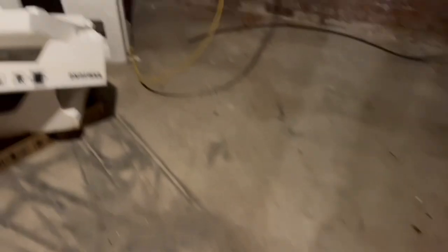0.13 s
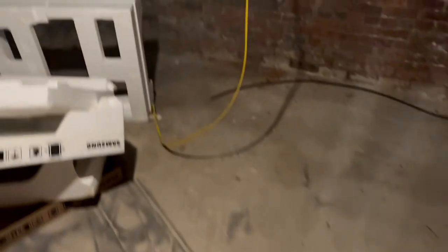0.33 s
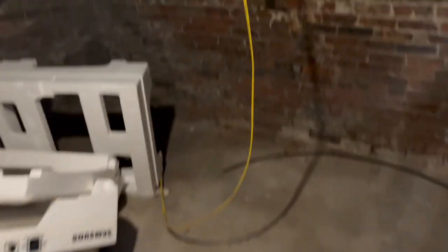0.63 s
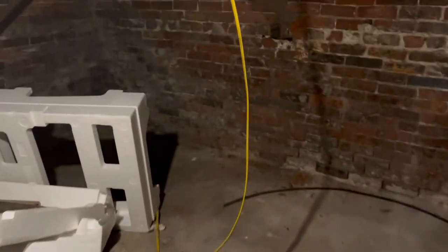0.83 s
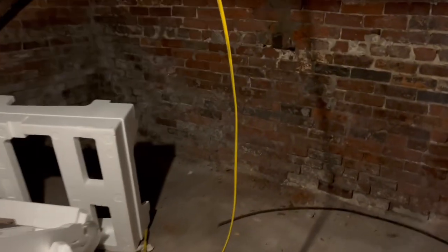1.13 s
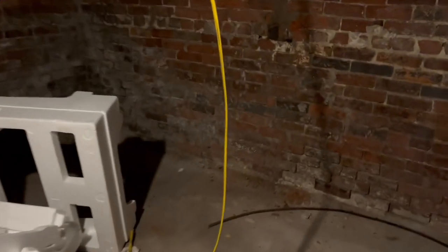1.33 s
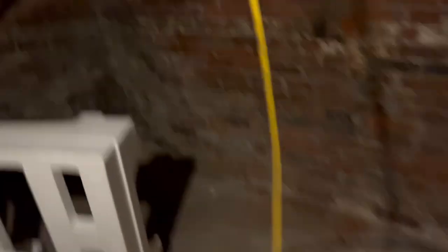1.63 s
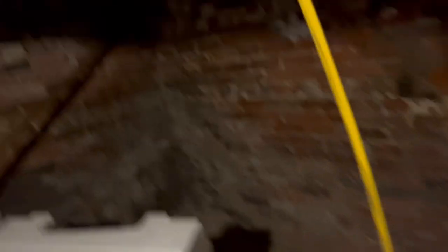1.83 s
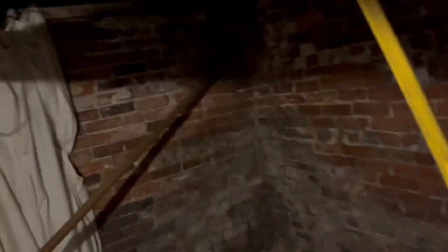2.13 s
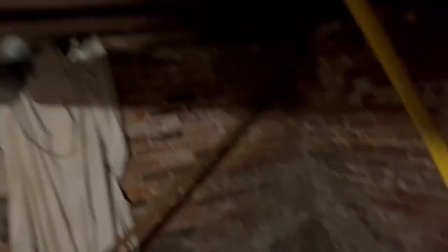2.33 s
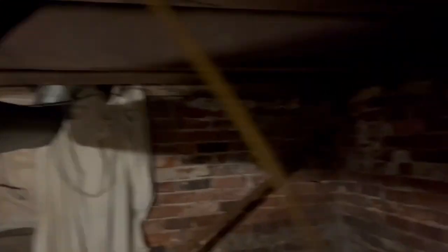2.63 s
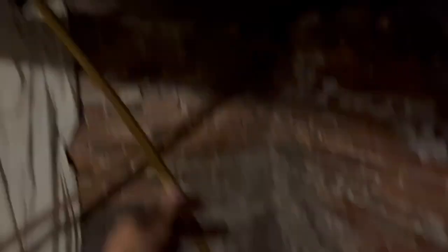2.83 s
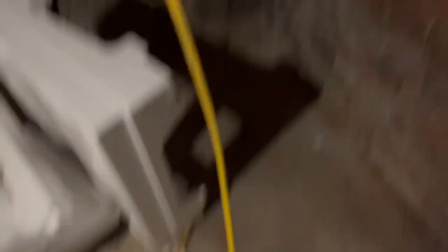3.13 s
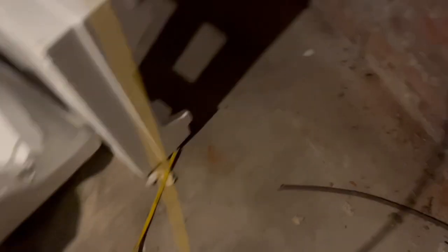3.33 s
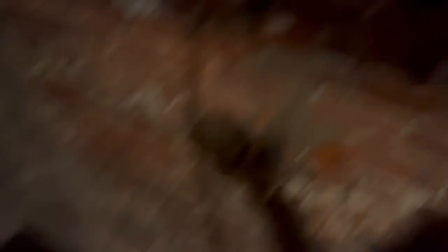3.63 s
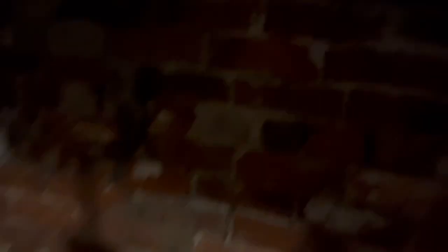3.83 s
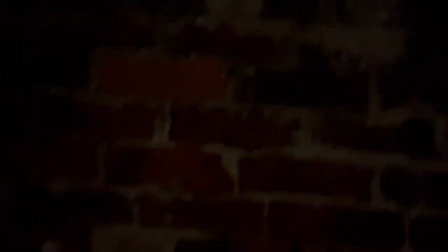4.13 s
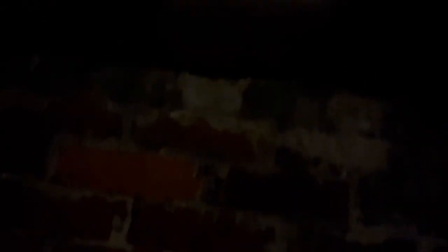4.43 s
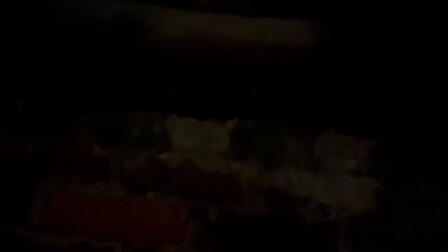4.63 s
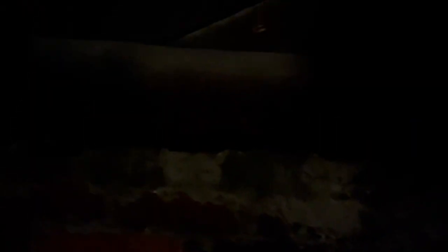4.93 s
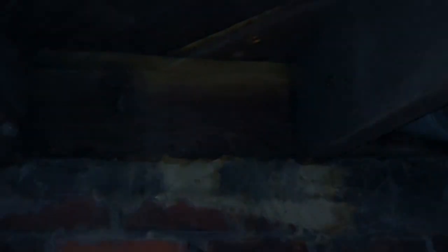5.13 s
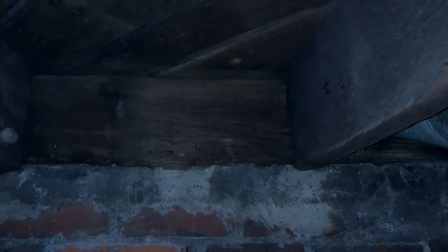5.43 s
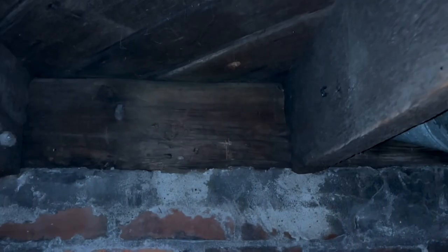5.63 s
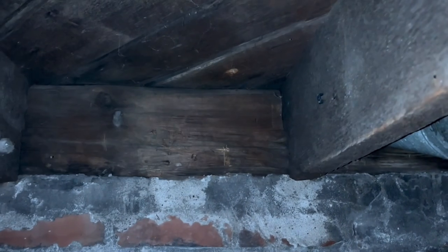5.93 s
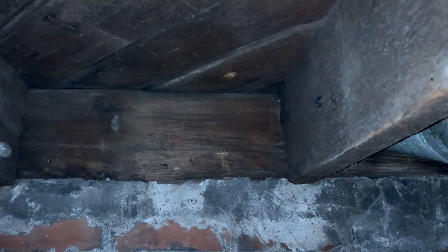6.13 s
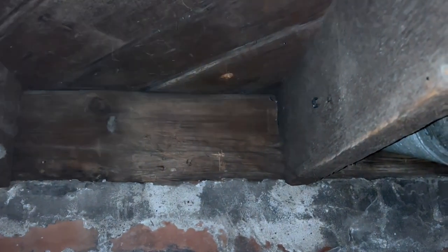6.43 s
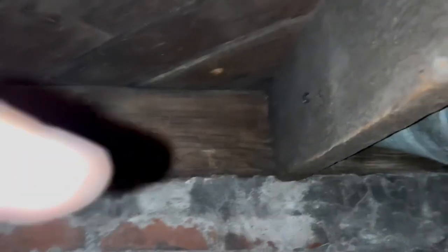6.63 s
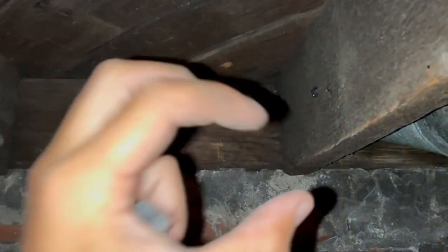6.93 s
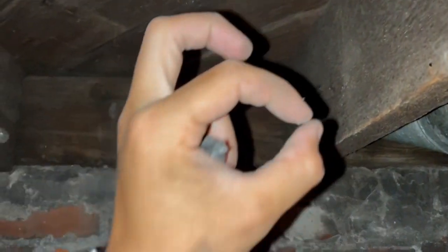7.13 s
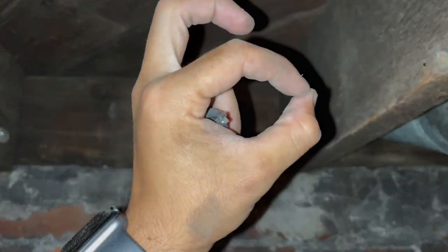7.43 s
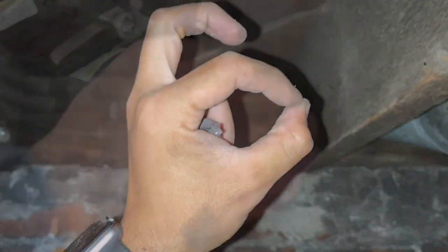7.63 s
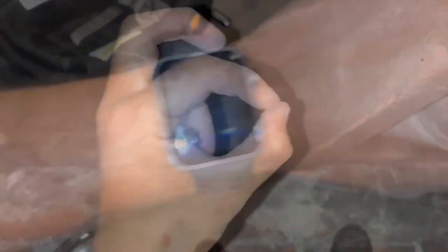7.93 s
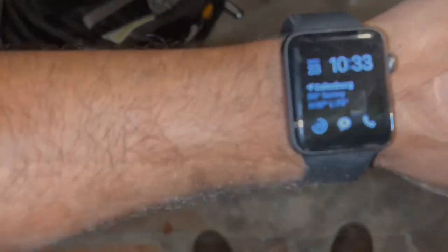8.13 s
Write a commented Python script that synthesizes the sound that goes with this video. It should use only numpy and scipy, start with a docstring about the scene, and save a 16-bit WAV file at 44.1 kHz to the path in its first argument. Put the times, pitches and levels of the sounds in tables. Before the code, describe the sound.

Loud blows on boards crack and echo in a cramped brick basement, with faint steel ringing, gritty scuffs and low hum between.

```python
"""Over a low hum and an airy rustle that rise and fall as shaped noise, soft bumps and scuffs come first.
Then hard blows on boards ring through a small brick cellar: contact noise excites damped board modes,
a beating steel pair rings thinly, and the walls answer with noise whose bass comes late and long.
Gritty rubbing fills the gaps; from 4.7 to 7.7 s the far-wall echo is absent and the late tail weaker.
Near the end a faint sine fades in, shortly before the last blow."""
import sys
import numpy as np
from scipy import signal
from scipy.fft import rfft, irfft, next_fast_len
from scipy.io import wavfile
from scipy.ndimage import uniform_filter1d

SR = 44100
rng = np.random.default_rng(int(sys.argv[2]) if len(sys.argv) > 2 else 0)


def waveform_to_disk(signal):
    """Save audio, clipped to [-1, 1], as 16-bit WAV at the path in sys.argv[1]."""
    frames = np.transpose(np.atleast_2d(signal))
    scaled = np.clip(frames, -1, 1) * 32767
    samples = np.round(scaled).astype(np.int16)
    wavfile.write(sys.argv[1], SR, samples)


def invert_db(level):
    """Linear amplitude ratio for a level in decibels (20 dB per decade), elementwise."""
    return 10 ** (np.asarray(level, dtype=float) / 20)


N = 365588  # samples
BANDS_HZ = 30 * 2 ** (np.arange(28) / 3)  # third-octave centres

# Hard blows. Each row: time in seconds, blow level in dB, wall level in dB, brightness in dB per octave,
# favoured tone in Hz, bass lift in dB.
KNOCKS = [(1.155, 2.5, -22, 0.53, 4300, -2), (1.62, -6, -24, 1.47, 1350, -2),
          (2.122, -1.5, -23, 1.24, 1700, 2.5), (2.679, -4, -23, 0.85, 3100, 5),
          (3.167, -0.5, -24, 1.09, 480, 0.2958), (3.676, -1.5, -23, 0.59, 3100, -3),
          (4.08, -26, -38, -0.5, 420, 3), (4.241, 1.5, -27, 0.294, 500, -1.5),
          (4.98, 1.5, -25, -2.5, 3250, -2.5), (5.47, -6, -29, -2.5, 3900, -3),
          (7.839, -10.5, -33, 2, 1900, -2)]
# Soft bumps of feet and hands. Each row: time in seconds, blow level in dB, wall level in dB,
# strongest frequency in Hz, fall-off in dB per octave.
BUMPS = [(.545, -37, -45, 110, 9), (1.505, -41, -47, 200, 8), (2.569, -39, -45, 340, 19),
         (3.932, -50, -66, 7000, 3), (3.968, -52, -68, 7000, 3), (4.79, -48, -68, 8000, 3),
         (4.815, -42, -66, 2000, 2), (6.481, -37, -66, 600, 7), (6.572, -37, -68, 600, 8),
         (6.772, -44, -50, 550, 10), (7.134, -51, -68, 500, 4), (7.317, -54, -58, 280, 8)]
# Modes of the struck boards, nominal before each blow varies them. Each row: frequency in Hz, level in dB,
# 60 dB decay time in seconds.
BOARD_MODES = [(170, -16, .05), (345, -9, .035), (526, 1, .025), (860, 0, .02), (1290, -2.5, .015),
               (2035, -1, .012), (2910, -2, .012), (3400, 1, .012), (4330, -2, .008), (5550, -1, .006),
               (7000, 1, .005), (9900, -1, .004), (12600, -1, .005)]
# Colour shared by all cracks. Each row: frequency in Hz, level in dB.
CRACK_COLOUR = [(500, 0), (1300, -7), (3000, 0.5), (9000, 0.5)]
# Colour shared by the echoes of hard blows. Each row: frequency in Hz, level in dB.
ECHO_COLOUR = [(90, -4), (250, -9.5), (520, 0.5), (850, -6), (1300, -5), (2050, -8), (3100, -3.5),
               (4500, -6), (9000, -13.5)]
# Bass modes of the cellar. Each row: frequency in Hz, relative level in dB, 60 dB decay time in seconds.
CELLAR_MODES = [(58, -6, .6), (74, -0.5, 1.2), (101, 2, .7), (128, -4, .5)]
# The walls' answer. Each row: frequency in Hz, level in dB, 60 dB decay time in seconds, build-up in seconds.
WALLS = [(40, -11.5, 0.54, .03), (69, -4.5, 0.55, .03), (150, -6.5, .65, 0.011), (324.1, -4.5, 0.52, 0.012),
         (636, -4, 0.43, 0.011), (1470, -2, 0.33, 0.0084), (1840, -9, 0.39, 0.0048),
         (2150, -2, 0.33, 0.013), (2900, -6, 0.27, 0.013), (6500, -1.5, 0.26, 0.0046),
         (11300, -4, 0.27, 0.0058), (15000, -14, .18, 0.026)]
# Blows that leave the steel ringing. Each row: time in seconds, low ring in dB, its 60 dB decay time
# in seconds, high ring in dB.
STEEL_RINGS = [(1.62, -27, .38, -85), (2.122, -42, .4, -55), (2.679, -26, .5, -47), (3.167, -35, 1.0, -85),
               (3.675, -29, .45, -55), (4.24, -36, .5, -55), (4.979, -50, .4, -62), (5.47, -55, .4, -72),
               (7.839, -47, .4, -50)]
# Close low steel modes that beat. Each row: frequency in Hz, relative level in dB.
STEEL_PAIR = [(2923, 0), (2903, -5)]
# Soles, cloth and hands rubbing. Each row: start in seconds, length in seconds, level in dB,
# tilt in dB per octave above 400 Hz.
SCUFFS = [(0, .12, -60, 1), (.54, .1, -64, 2), (.7, .17, -65, 1), (1.5, .1, -59, 1), (2.35, .3, -61, 4),
          (2.96, .025, -53, 5), (3.0, .06, -47, 5), (3.53, .05, -48, 4), (4.0, .07, -53, 3),
          (4.085, .14, -39, 0.5), (4.545, .09, -52, 2), (4.85, .1, -53, -1), (6.19, .1, -67, -6),
          (6.38, .025, -65, 0), (6.49, .05, -55, -1), (6.545, .025, -50, 1), (6.62, .12, -67, -3),
          (6.78, .22, -52, -7), (7.135, .025, -63, -1), (7.21, .17, -70, 3), (7.33, .18, -54, -8),
          (7.445, .19, -60, 0.5)]
# Spectrum of rubbed grit. Each row: frequency in Hz, density in dB per Hz.
GRIT = [(100, -12), (250, 0), (500, -1.5), (800, -8), (1300, -9), (2000, -17), (4500, -13), (6500, -16),
        (9000, -23), (12500, -28), (16000, -36)]
# Spectrum of the hum. Each row: frequency in Hz, density in dB per Hz.
HUM = [(15, -46), (25, -16), (43, -7.5), (75, -5), (107, 0.5), (199, -27), (232, -24), (437, -39),
       (1500, -48.5), (1950, -78), (3300, -120)]
# Spectrum of the airy rustle. Each row: frequency in Hz, density in dB per Hz.
AIR = [(100, -10), (200, 0), (450, 0), (1300, -8), (2000, -16), (3200, -15), (4500, -10), (6500, -17),
       (9000, -25), (16000, -36)]
# Background levels. Each row: time in seconds, hum in dB, airy rustle in dB.
BACKGROUND = [(0, -56, -62), (.9, -55, -67), (1.5, -50, -64), (2, -50, -73), (2.5, -50, -66),
              (4.45, -49, -64), (4.75, -56, -72), (5.7, -62, -88), (6.2, -67, -88), (6.7, -68, -88),
              (6.9, -60, -84), (7.6, -55, -77), (8.29, -53, -80)]
# Likeness of the diffuse sound at the two ports. Each row: frequency in Hz, correlation.
LIKENESS = [(60, 1), (250, .8), (600, .45), (1500, .1), (6000, 0), (7400, -.5), (7900, -.98), (9300, -.98),
            (10300, 0), (11000, 0.94), (13200, .93), (14300, -.6)]
# Phase of the direct sound between the ports. Each row: frequency in Hz, lead of the left in radians.
PORT_PHASE = [(100, 0.5), (2300, 0.1635), (2920, 1.83), (3700, 0.3155), (5600, -0.6273), (7700, -1),
              (9500, -3.5), (11000, -7), (13400, -7), (15000, -9)]
# Span in which the microphone is held in a nook: start and end in seconds.
NOOK_S = (4.7, 7.7)

NOOK_DB = -7  # the nook shields from the far corners; it also hides the far wall
CONTACT_S, CONTACT_RISE_S = .0022, .0016  # a knock's chatter: decay, time to its peak
FAVOUR_DB, FAVOUR_OCTAVES = 6.5, 0.75  # where a blow lands lifts one region of tones
CRACK_SHARE = .6  # how much of a blow's own colour shows in the crack
FAR_WALL_S, FAR_WALL_DB = 0.02, 3.5  # the strongest echo: delay, lift
LATE_DB, LATE_STRETCH = -23, 1.68  # a weaker, slower tail from the further corners
TAIL_RING_DB, TAIL_RING_WIDTH = -1, .035  # board tones in the echoes: dB, width as a share of pitch
STEEL_HIGH_HZ, STEEL_HIGH_T60_S = 10605, .6
STEEL_HELD_S, STEEL_FADE_S = .35, .05  # the grip tightens for the next swing and damps the ring
DRONE_HZ, DRONE_DB, DRONE_S, DRONE_RISE_S = 188, -54, 7.45, .7


def along(table, hz, col):
    """Linear interpolation of a table column on a log-frequency axis."""
    table = np.asarray(table, float)
    return np.interp(np.log(hz), np.log(table[:, 0]), table[:, col])


def add(out, sound, s):
    """Superposition: mixes a sound or a power envelope in at time s."""
    i = int(s * SR)
    out[..., i:i + sound.shape[-1]] += sound[..., :N - i]


def stepped_noise(shape, size, step):
    """Random levels held for step samples, then smoothed into a slow fluctuation."""
    draws = rng.standard_normal((*shape, size // step + 1))
    held = np.repeat(draws, step, axis=-1)
    return uniform_filter1d(held, step, axis=-1)[..., :size]


def ring(hz, t60, size):
    """Free vibration of one damped mode: a sine under exponential decay."""
    t = np.arange(size) / SR
    return np.sin(2 * np.pi * hz * t) * np.exp(-np.log(1000) * t / t60)


def tint(hz, bright_db, favoured_hz):
    """Excitation spectrum of a blow: a tilt above 500 Hz and a lift around one favoured region."""
    tilt = bright_db * np.log2(np.clip(hz / 500, 1, None))
    octaves = np.log2(hz / favoured_hz)
    return tilt + FAVOUR_DB * np.exp(-(octaves / FAVOUR_OCTAVES) ** 2)


def strike(colour_db, contact_s):
    """Modal excitation: brief, uneven contact forces convolved with the boards' damped modes."""
    t = np.arange(int(.015 * SR)) / SR - CONTACT_RISE_S
    decay = np.where(t < 0, CONTACT_RISE_S / 2, contact_s)
    contacts = rng.standard_normal(len(t)) ** 3 * np.exp(-np.abs(t) / decay)  # cubing makes touches sparse
    contacts[int(CONTACT_RISE_S * SR)] = 9.0  # a hard touch at the peak
    size = int(.08 * SR)
    body = np.zeros(size)
    for (hz, db, t60), mode_tint in zip(BOARD_MODES, colour_db):
        level = invert_db(db + mode_tint + 2.0 * rng.standard_normal())
        body += level * ring(hz * (1 + .03 * rng.standard_normal()), t60, size)
    sound = signal.fftconvolve(contacts, body)
    return sound / np.abs(sound).max()


def blows():
    """Source and room response: direct sound, cellar bass modes, and the power the walls send back."""
    direct, booms, power = np.zeros(N), np.zeros(N), np.zeros((len(BANDS_HZ), N))
    board_hz = np.array(BOARD_MODES)[:, 0]
    bass = np.clip(np.log2(300 / BANDS_HZ) / 1.5, 0, 1)
    for s, db, wall_db, bright_db, hz, bass_db in KNOCKS:
        colour_db = along(CRACK_COLOUR, board_hz, 1) + CRACK_SHARE * tint(board_hz, bright_db, hz)
        add(direct, invert_db(db) * strike(colour_db, CONTACT_S), s - CONTACT_RISE_S)
        echo_db = along(ECHO_COLOUR, BANDS_HZ, 1) + tint(BANDS_HZ, bright_db, hz) + bass_db * bass
        add(power, wall_answer(s, wall_db + echo_db), s)
        add(booms, invert_db(wall_db + bass_db - 3.5) * cellar_boom(), s)
    for s, db, wall_db, hz, fall_db in BUMPS:
        colour_db = -fall_db * np.abs(np.log2(board_hz / hz))
        add(direct, invert_db(db) * strike(colour_db, .0008), s - CONTACT_RISE_S)  # 0.8 ms contact decay
        add(power, wall_answer(s, wall_db - fall_db * np.abs(np.log2(BANDS_HZ / hz))), s)
    return direct, booms, power


def cellar_boom():
    """Standing waves of the room: low modes of random sign that swell before they decay."""
    size = int(1.2 * SR)
    swell = 1 - np.exp(-np.arange(size) / SR / .02)
    return swell * sum(invert_db(db) * rng.choice([-1, 1]) * ring(hz, t60, size) for hz, db, t60 in CELLAR_MODES)


def wall_answer(s, db):
    """Reverberation: band power builds up in clumps of echoes, then decays, mostly faster in the treble."""
    size = int(1.2 * SR)
    t = np.arange(size)[None] / SR
    hidden = NOOK_S[0] < s < NOOK_S[1]
    wall_db, t60, build = (along(WALLS, BANDS_HZ, c)[:, None] for c in (1, 2, 3))
    step = int(.008 * SR)
    # part of the clumping is common to all bands
    clumps_db = 1.2 * stepped_noise((1,), size, step) + 2.2 * stepped_noise((len(BANDS_HZ),), size, step)
    far_wall_db = FAR_WALL_DB * (1 - hidden) * np.exp(-((t - FAR_WALL_S) / 0.0046) ** 2)
    onset = (1 - np.exp(-(t / build) ** 2)) * invert_db(clumps_db + far_wall_db)
    early = invert_db(-60 * t / t60)
    late = invert_db(LATE_DB + NOOK_DB * hidden - 60 * t / (LATE_STRETCH * t60))
    return (invert_db(wall_db + db[:, None]) * onset * (early + late)) ** 2


def steel():
    """Beating of two close modes of the tool under a wavering level, joined by one high mode."""
    out, size = np.zeros(N), int(1.2 * SR)
    grip = np.exp(-np.clip(np.arange(size) / SR - STEEL_HELD_S, 0, None) / STEEL_FADE_S)
    for s, low_db, t60, high_db in STEEL_RINGS:
        waver = invert_db(3.0 * stepped_noise((), size, int(.04 * SR)))
        pair = sum(invert_db(db) * ring(hz, t60, size) for hz, db in STEEL_PAIR)
        high = ring(STEEL_HIGH_HZ, STEEL_HIGH_T60_S, size)
        add(out, waver * grip * (invert_db(low_db) * pair + invert_db(high_db) * high), s)
    return out


def band_power(spectrum):
    """Spectral integration: the share of power in each third-octave band of a per-Hz spectrum."""
    power = invert_db(along(spectrum, BANDS_HZ, 1)) ** 2 * BANDS_HZ
    return power / power.sum()


def scuffs():
    """Friction noise on grit: quick rise, uneven drag that slackens, short fade."""
    power = np.zeros((len(BANDS_HZ), N))
    t = np.arange(int(.5 * SR)) / SR
    for s, length, db, tilt_db in SCUFFS:
        fade = np.exp(-np.clip(t - length, 0, None) / .025)
        drag = np.clip(t / .015, 0, 1) * invert_db(-4 * t / length) * fade
        draws = np.repeat(rng.standard_normal(len(t) // 256 + 1), 256)
        grain = invert_db(2.6 * uniform_filter1d(draws, 128)[:len(t)])
        colour_db = tilt_db * np.log2(np.clip(BANDS_HZ / 400, 1, None))
        colour_db = colour_db + 2.5 * rng.standard_normal(len(BANDS_HZ))
        shape = band_power(GRIT) * invert_db(colour_db) ** 2
        add(power, (shape / shape.sum())[:, None] * (invert_db(db) * drag * grain) ** 2, s)
    return power


def drone():
    """Pure tone: a faint sine that fades in near the end."""
    t = np.arange(N) / SR
    fade_in = np.clip((t - DRONE_S) / DRONE_RISE_S, 0, 1)
    return invert_db(DRONE_DB) * fade_in * np.sin(2 * np.pi * DRONE_HZ * t)


def background():
    """Stationary noise modulated slowly: house hum and airy rustle, each band wavering on its own."""
    s, hum_db, air_db = np.transpose(BACKGROUND)
    t = np.arange(N) / SR
    waver = invert_db(2.5 * stepped_noise((len(BANDS_HZ),), N, int(.06 * SR)))
    hum = band_power(HUM)[:, None] * invert_db(np.interp(t, s, hum_db)) ** 2
    air = band_power(AIR)[:, None] * invert_db(np.interp(t, s, air_db)) ** 2
    return waver ** 2 * (hum + air)


def diffuse(power, echo_power):
    """Diffuse field: partly correlated stereo noise follows band power; echoes also carry board tones."""
    size = next_fast_len(N)
    hz = np.arange(size // 2 + 1) * SR / size + 1e-3  # the offset avoids log of zero
    like = np.clip(along(LIKENESS, hz, 1), -1, 1)
    mid, side = rfft(rng.standard_normal((2, 2, size)))  # two independent draws of each
    common, opposed = mid * np.sqrt(1 + like), side * np.sqrt(1 - like)
    pair = np.array([common + opposed, common - opposed])
    layers = []
    for centre, band in zip(BANDS_HZ, power):
        shape = np.cos(np.pi / 2 * np.clip(3 * np.log2(hz / centre), -1, 1))
        layers.append((pair[:, 0] * shape, band))
    for tone, db, _ in BOARD_MODES:
        nearest = np.abs(np.log(BANDS_HZ / tone)).argmin()
        peak = 1 / (1 + (2 * (hz - tone) / (TAIL_RING_WIDTH * tone)) ** 2)
        layers.append((pair[:, 1] * peak, echo_power[nearest] * invert_db(db + TAIL_RING_DB) ** 2))
    out = np.zeros((2, N))
    for spectrum, envelope in layers:
        noise = irfft(spectrum, size)[:, :N]
        out += noise / noise.std() * np.sqrt(envelope)
    return out


def scene():
    """Superposed fields: direct sound with a phase gap between the ports, booms, drone and diffuse sound."""
    direct, booms, power = blows()
    hz = np.arange(N // 2 + 1) * SR / N + 1
    turn = np.exp(.5j * along(PORT_PHASE, hz, 1))  # half the gap on each side
    ports = irfft(rfft(direct + steel()) * np.array([turn, turn.conj()]), N)
    return ports + booms + drone() + diffuse(power + scuffs() + background(), power)


def top_cut(x):
    """Nothing passes above the cut-off."""
    return signal.sosfilt(signal.butter(12, 15970, fs=SR, output="sos"), x)


def record(dry):
    """Transducer limits: a small microphone drops the deepest bass and rounds the loudest peaks."""
    high_pass = signal.butter(4, 45, "high", fs=SR, output="sos")
    sound = signal.sosfilt(high_pass, dry)
    finished = np.tanh(sound * .8) / .8
    return top_cut(finished)


dry = scene()
out = record(dry)
waveform_to_disk(out)
```